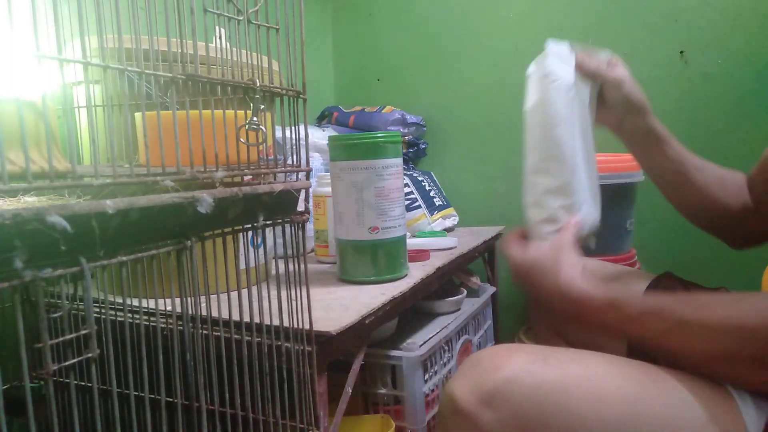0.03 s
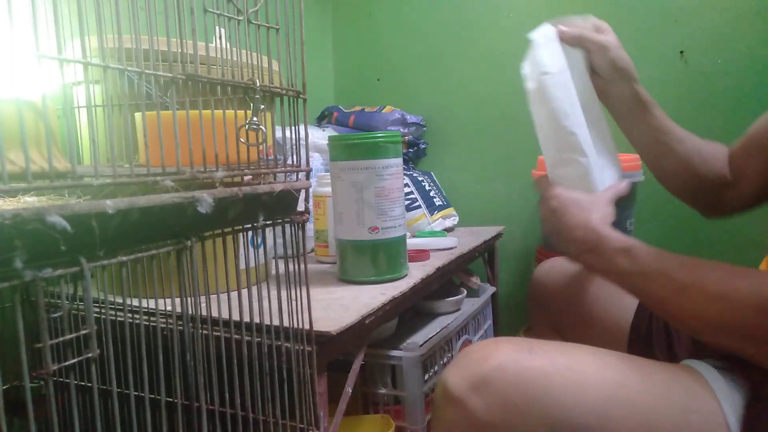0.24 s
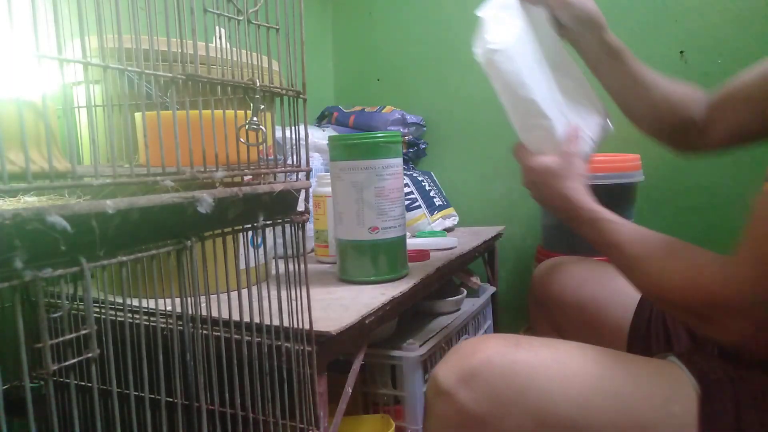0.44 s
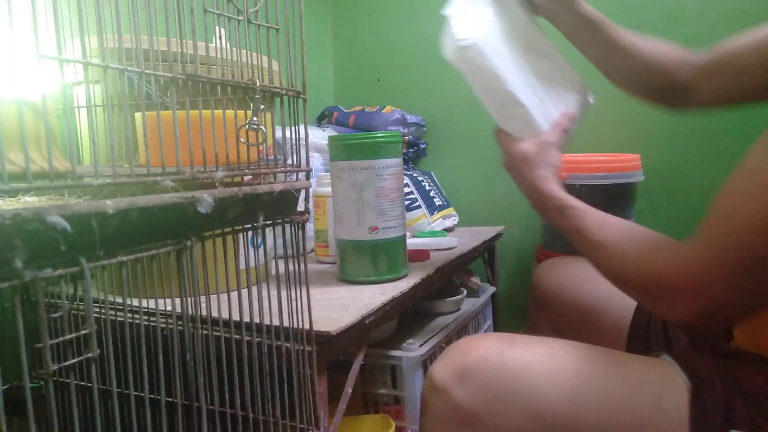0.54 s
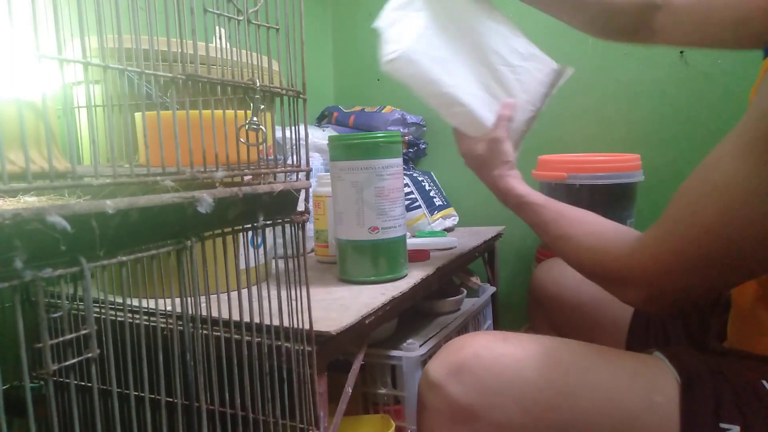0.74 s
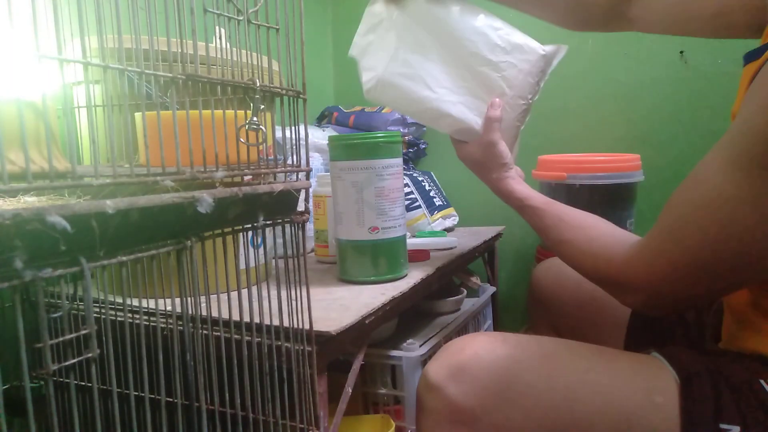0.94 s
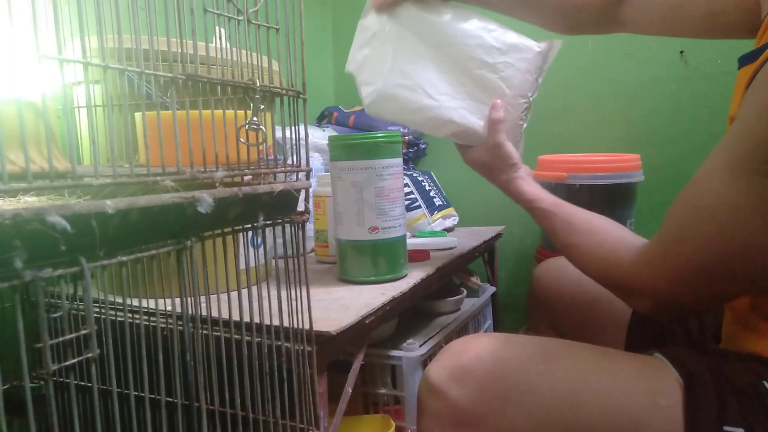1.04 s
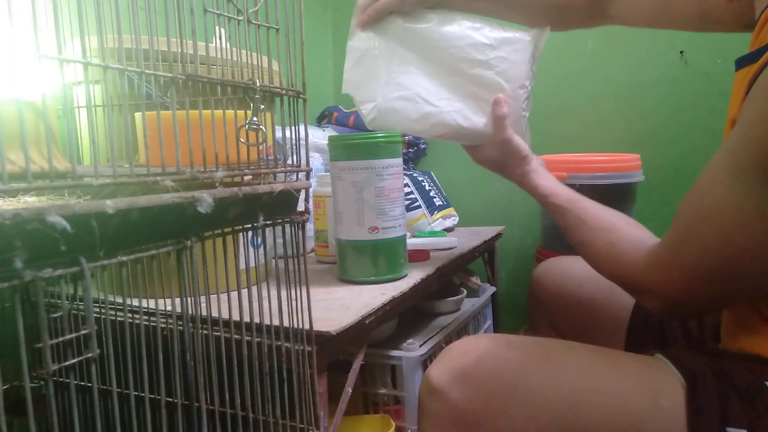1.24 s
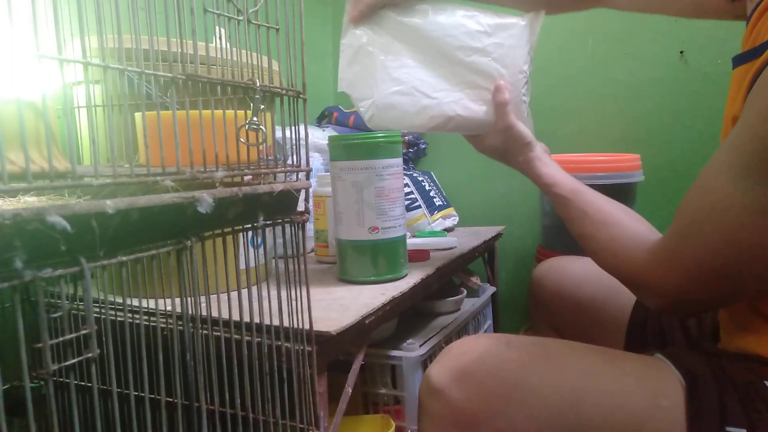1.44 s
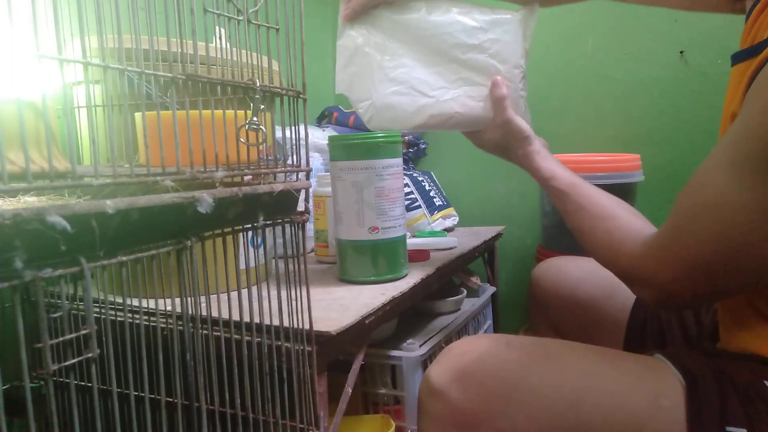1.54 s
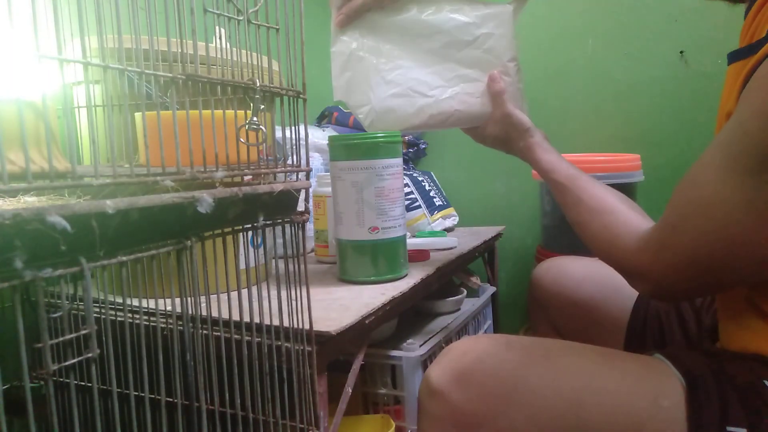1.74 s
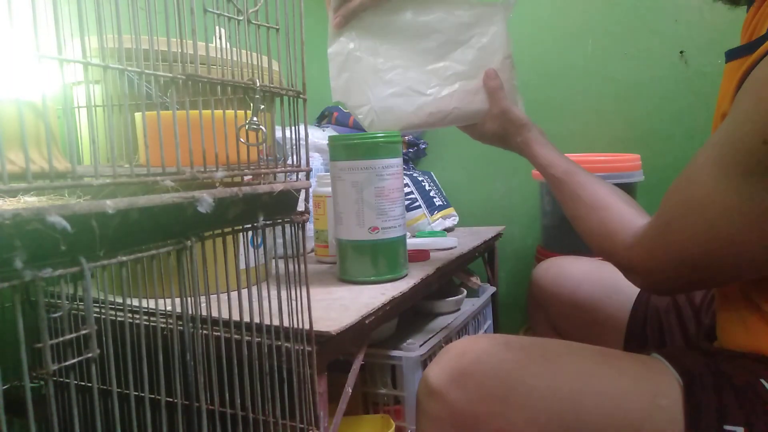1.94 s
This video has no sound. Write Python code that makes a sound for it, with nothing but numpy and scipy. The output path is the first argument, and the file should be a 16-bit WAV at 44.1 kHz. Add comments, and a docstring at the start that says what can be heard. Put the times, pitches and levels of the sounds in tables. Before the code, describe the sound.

A small parrot shrieks loudly and harshly up close after soft plastic bag rustling in a room

```python
"""A plastic bag rustles, crackles and pips in someone's hands over the hum and hiss of a hard-walled room.
Its rustle is patchy noise with sparse grains; snaps are dying noise bursts; pips are short sines.
From 0.86 s a far bird chirps faintly: short gliding notes made of partials.
From 1.5 s a small parrot close by shrieks twice, in overlapping phrases of rough partials and air."""
import sys
import numpy as np
from scipy import signal
from scipy.fft import rfft, irfft, next_fast_len
from scipy.io import wavfile
from scipy.ndimage import uniform_filter1d, map_coordinates

SR = 44100
rng = np.random.default_rng(int(sys.argv[2]) if len(sys.argv) > 2 else 0)


def level_to_linear(level):
    """Convert decibel levels to linear amplitude factors, elementwise."""
    exponent = np.asarray(level, float) / 20
    return 10 ** exponent


def pcm_store(signal):
    """Save signal as 16-bit PCM."""
    levels = np.round(np.clip(np.atleast_2d(signal), -1, 1) * 32767)
    wavfile.write(sys.argv[1], SR, levels.astype(np.int16).T)


N = 88376


def unit(x):
    """Scale to rms 1."""
    return x / np.sqrt(np.mean(x ** 2) + 1e-20)


def curves(rows):
    """One value per sample for each column after the time."""
    times, *columns = np.transpose(rows)
    return [np.interp(np.arange(N) / SR, times, column) for column in columns]


def gain(points, hz):
    """Linear gain from (frequency [Hz], gain [dB]) points on a log frequency axis."""
    f, db = np.transpose(points)
    return level_to_linear(np.interp(np.log(hz + 1), np.log(f + 1), db))


def wobble(rate):
    """A smooth random curve with rate knots a second, at most 1900."""
    knots = rng.standard_normal(int(N * 2000 / SR))
    return map_coordinates(knots, [np.arange(N) * min(rate, 1900) / SR])


def coloured(x, points):
    """Filter x with a spectrum of (frequency [Hz], gain [dB]) points."""
    size = next_fast_len(len(x) + 8192)
    shape = gain(points, np.fft.rfftfreq(size, 1 / SR))
    return irfft(rfft(x, size) * shape, size)[:len(x)]


def rush(points, patchy_db):
    """Coloured noise of rms 1 whose gain varies in random patches of time and frequency."""
    z = signal.stft(rng.standard_normal(N + 512), nperseg=512)[2]
    field = uniform_filter1d(rng.standard_normal(z.shape), size=5, axis=0)
    field = uniform_filter1d(field, size=8, axis=1)
    noise = signal.istft(z * level_to_linear(patchy_db * unit(field)), nperseg=512)[1][:N]
    return unit(coloured(noise, points))


def room(x, wet_db):
    """The sound plus a noise tail, 3 ms late, in which each frequency dies at its own speed."""
    # reverberation time: (frequency [Hz], T60 [s])
    decay_times = [(500, 0.51), (2500, 0.35), (5000, 0.35), (9000, 0.33), (15000, 0.11)]
    hz, t, z = signal.stft(rng.standard_normal(SR // 2), SR, nperseg=256)
    f, t60 = np.transpose(decay_times)
    decay = level_to_linear(-60 * t / np.interp(hz, f, t60)[:, None])
    tail = signal.istft(z * decay, SR, nperseg=256)[1]
    tail = np.pad(tail / np.linalg.norm(tail), (round(0.003 * SR), 0))
    return x + level_to_linear(wet_db) * signal.fftconvolve(x, tail)[:N]


def bag_rustle():
    """Creasing film: patchy noise plus about 220 ringing grains a second, riding one level curve."""
    # handling of the bag: (time [s], level [dB])
    handling = [(0, -57), (.15, -64), (.21, -53.5), (.3, -57.5), (.42, -63.5), (.55, -59), (.68, -56),
                (.79, -49), (.86, -54.5), (.92, -63), (1.02, -64), (1.15, -54.5), (1.2, -59.5),
                (1.25, -50.5), (1.33, -62), (1.42, -65.5), (1.5, -62)]
    # colour of the plastic: (frequency [Hz], relative density [dB per Hz])
    plastic = [(150, -66), (250, -10), (462, -8), (876, 0), (980, -7.5), (1500, -2.5), (1770, -7),
               (5000, -23.5), (7000, -63)]
    # ring of the small grains: (frequency [Hz], gain [dB])
    grain_ring = [(600, -10), (1400, -7), (2600, -8.5)]
    level_db, = curves(handling)
    grains = (rng.random(N) < 220 / SR) * rng.standard_normal(N)
    grains = unit(coloured(coloured(grains, grain_ring), plastic))
    return level_to_linear(level_db) * unit(rush(plastic, patchy_db=2.0) + level_to_linear(-3) * grains)


def snap_burst(colour, t60):
    """Noise swells to a tick and dies by 60 dB in t60 seconds."""
    lead_s, rise_s, tick = 0.005, 0.002, 2.9  # rise_s: time for a 60 dB swell; tick: against noise of rms 1
    t = np.arange(SR // 10) / SR
    burst = rng.standard_normal(len(t))
    burst[round(lead_s * SR)] += tick
    envelope = level_to_linear(-60 * np.abs(t - lead_s) / np.where(t < lead_s, rise_s, t60))
    return coloured(burst * envelope, colour)


def bag_crackles():
    """Single creases snap, each a body and a treble burst answered by the room."""
    # snaps: (time of tick [s], overall gain [dB], treble gain against body [dB])
    snaps = [(0.0351, -48, -9), (0.1141, -52, -1.5), (0.198, -46.5, -6), (0.2641, -44.5, -8.5),
             (0.605, -34.5, -13.5), (0.7314, -40.5, -19), (1.1457, -45, -9)]
    # body of a snap: (frequency [Hz], gain [dB])
    body_colour = [(700, -31), (1400, -10), (2300, 10.5), (3000, 0), (4500, -15)]
    # treble of a snap: (frequency [Hz], gain [dB])
    treble_colour = [(2500, 9.5), (4500, 9.5), (7000, 10), (9500, -18), (15500, 3)]
    out = np.zeros(N)
    for s, db, treble_db in snaps:
        body = snap_burst(body_colour, t60=0.02)
        treble = snap_burst(treble_colour, t60=0.023)
        snap = np.zeros(N + SR)
        snap[round((s - 0.005) * SR):][:len(body)] = level_to_linear(db) * (body + level_to_linear(treble_db) * treble)
        out += room(snap[:N], wet_db=-2)
    return out


def bag_pips():
    """Taut creases ring briefly: dry sines with a soft start and a fast decay."""
    # pips: (start [s], frequency [Hz], level before rise and decay [dB])
    pips = [(.6855, 5010, -52.5), (.822, 3750, -50)]
    out, t = np.zeros(N), np.arange(SR // 10) / SR
    for s, hz, db in pips:
        decay = level_to_linear(db - 60 * t / 0.04)
        rise = 1 - level_to_linear(-60 * t / 0.005)
        out[round(s * SR):][:len(t)] += decay * rise * np.sin(2 * np.pi * hz * t)
    return out


def house_hum():
    """Low hum of the house: patchy low noise whose level drifts slowly around -60 dB."""
    # hum colour: (frequency [Hz], relative density [dB per Hz])
    hum_colour = [(15, -2.5), (48, -1), (80, -9), (124, -2), (325, -20.5), (520, -12.5), (880, -120)]
    return level_to_linear(-60 + wobble(1.83)) * rush(hum_colour, patchy_db=3.0)


def treble_hiss():
    """Hiss: patchy treble noise that follows a level curve."""
    # hiss strength: (time [s], level [dB])
    hiss_level = [(0, -62.5), (.45, -64.5), (.55, -53), (.66, -61.5), (.85, -55), (1, -52.5), (1.2, -56),
                  (1.5, -50.5)]
    # hiss colour: (frequency [Hz], relative density [dB per Hz])
    hiss_colour = [(1470, -3.5), (2500, 1), (4070, -3), (5860, 0), (7000, 6.5), (10300, -7), (12800, -2.5),
                   (15200, 5)]
    level_db, = curves(hiss_level)
    return level_to_linear(level_db) * rush(hiss_colour, patchy_db=2.0)


def voice(rows, odd_db, throat, breath_db):
    """Eight partials on a wandering pitch, fluttering and rasping as roughness grows, with air."""
    # air in the voice: (frequency [Hz], relative density [dB per Hz])
    breath_colour = [(250, -27.5), (2200, -30), (2550, 1), (3500, -7), (5600, -1.5), (7600, 4),
                     (9000, -18.5), (12500, -8), (13800, -8), (15700, -9)]
    attack_s, release_s, top_hz = 0.0033, 0.012, 15830
    pitch, level_db, rough = curves(rows)
    rough = np.clip(rough, 0, 1)
    pitch = pitch * (1 + 0.038 * rough * wobble(301.75))
    phase = 2 * np.pi * np.cumsum(pitch) / SR
    # beat of the two sides of the voice, around 464.7 Hz
    beat = 2 * np.pi * np.cumsum(464.7 * (1 + 0.15 * wobble(60))) / SR

    k = np.arange(1, 9)[:, None]  # partial numbers
    size = gain(throat, k * pitch) * level_to_linear(odd_db * (k % 2)) * (k * pitch < top_hz)
    # fast phase scatter in radians, wider in the higher partials
    rasp = 1.42 * k ** 0.45 * rough * wobble(892.9)
    partials = size * np.sin(k * phase + k * k + rasp)
    tone = np.sum(partials, axis=0) / np.sqrt(np.sum(size ** 2, axis=0) / 2)
    flutter = 1 + 0.42 * rough * np.sin(beat)
    tone = tone * flutter * level_to_linear(3.8 * rough * wobble(250))
    air = level_to_linear(breath_db) * np.sqrt(rough) * rush(breath_colour, patchy_db=4.5)

    t = np.arange(N) / SR
    fade_in = 1 + (t - rows[0][0]) / attack_s
    fade_out = 1 + (rows[-1][0] - t) / release_s
    edges = np.clip(np.minimum(fade_in, fade_out), 0, 1) ** 2
    return level_to_linear(level_db) * (tone + air) * edges


def far_bird():
    """Each faint note glides to its pitch, rougher for a wider glide, sags and rings in the room."""
    # notes: (start [s], length [s], first pitch [Hz], held pitch [Hz], level [dB], odd partials' gain [dB])
    chirps = [(0.863, 0.068, 2590, 2605, -50.5, -4), (0.871, 0.063, 2253, 2251, -47, -5),
              (0.967, 0.04, 3900, 2832, -42.5, -13), (0.982, 0.053, 2400, 2240, -47.5, -11),
              (1.02, 0.04, 2008, 1960, -44.5, -48), (1.052, 0.024, 2100, 2146, -44.5, -44),
              (1.059, 0.068, 2183, 2275, -51.5, -43)]
    # far throat and beak: (frequency [Hz], gain [dB])
    far_throat = [(2250, 12.5), (2700, -2.5), (4000, 4), (5000, -10), (6800, 18.5), (8000, -10),
                  (11500, -20), (13200, -5), (14200, -7)]
    glide_s, sag_db, base_rough = 0.022, 5.5, 0.21
    out = np.zeros(N)
    for s, length, first, held, db, odd_db in chirps:
        glide_rough = base_rough + 2.56 * abs(first / held - 1)
        rows = [(s, first, db - sag_db, glide_rough),
                (s + glide_s, held, db, base_rough),
                (s + length, held, db - sag_db, base_rough)]
        out += room(voice(rows, odd_db, far_throat, breath_db=-2), wet_db=-4.5)
    return out


def parrot():
    """Both sides of the voice shriek in overlapping phrases, each of which fills the room."""
    # phrases: (odd partials' gain [dB], rows of (time [s], pitch [Hz], level [dB], roughness [0-1]))
    squawk = [ (3, [(1.507, 2406, -36.5, 0.52), (1.528, 2439, -25.5, 0.26), (1.558, 2449, -20, 0.27),
              (1.578, 2487, -53, 0.3)]), (-36, [(1.512, 2700, -30, 0.5), (1.545, 2689, -29, 0.27),
              (1.575, 2796, -20.5, 0.44), (1.586, 2766, -25.5, 0.49), (1.612, 3055, -31, 0.4)]),
              (1.5, [(1.62, 3209, -24, .5), (1.635, 3150, -33, 0.46), (1.67, 3156, -37.5, 0.56)]),
              (-17, [(1.6, 1950, -23.5, 0.38), (1.636, 1989, -32, 0.37), (1.642, 2213, -20, 0.11),
              (1.664, 2219, -19.5, 0.2), (1.672, 2223, -35, 0.2), (1.68, 2238, -20.5, 0.04),
              (1.695, 2219, -43, 0.14), (1.712, 2100, -35, 0)]), (0.5, [(1.718, 2385, -25, .45),
              (1.74, 2445, -25, 0.39), (1.768, 2544, -23, 0.16), (1.8, 2561, -26, 0.28),
              (1.81, 2645, -30, 0.8), (1.85, 2657, -78, 0.3), (1.885, 2660, -26.5, 0.89)]),
              (1.5, [(1.72, 2922, -30.5, 0.46), (1.79, 2790, -32, 0.6), (1.808, 2903, -23, 0.33),
              (1.835, 2878, -39, 0.08), (1.87, 2844, -35, 0.55)]), (-12.5, [(1.75, 1994, -26.5, 0.49),
              (1.79, 1865, -34, 0.79), (1.806, 2078, -26, 0.16), (1.86, 2091, -29.5, 0.37)]),
              (-1.5, [(1.872, 1833, -33.5, 0.6), (1.9, 1876, -36, 0.47), (1.918, 1947, -34, 0.8)])]
    # opening of the first shriek, beak still shut: (time [s], pitch [Hz], level [dB], roughness [0-1])
    opening = [(1.503, 1950, -48.5, .4), (1.512, 2400, -36.5, 0.48), (1.56, 2498, -32.5, 0.1)]
    # shut beak, which favours the lowest partial: (frequency [Hz], gain [dB])
    shut_beak = [(2800, -4), (4000, -40)]
    # open throat and beak: (frequency [Hz], gain [dB])
    open_throat = [(2100, -20.5), (2450, -13), (3200, 2), (4300, 7), (5300, 3.5), (7300, -2), (8600, -15),
                   (10200, -10), (12200, -14), (13500, -28), (14800, 0), (15700, -19)]
    phrases = [voice(rows, odd_db, open_throat, breath_db=-4.5) for odd_db, rows in squawk]
    phrases.append(voice(opening, 0, shut_beak, breath_db=-4.5))
    return sum(room(phrase, wet_db=-2.5) for phrase in phrases)


def scene():
    """All sources at one microphone."""
    bag = bag_rustle() + bag_crackles() + bag_pips()
    background = house_hum() + treble_hiss()
    return (bag + background + far_bird() + parrot())[None]


def top_cut(x):
    """Nothing passes above the cut-off."""
    return signal.sosfilt(signal.butter(12, 15830, fs=SR, output="sos"), x)


def record(dry):
    """A small microphone adds a coloured square-law bend, which grows when the sound is loud."""
    # colour of the bend: (frequency [Hz], gain [dB])
    bend_colour = [(60, -13), (250, -2), (1500, 7), (9000, -30), (15500, -11)]
    bend = level_to_linear(-11.5) * coloured(dry[0] ** 2, bend_colour)
    mix = dry + bend
    return top_cut(mix)


dry = scene()
out = record(dry)
pcm_store(out)
```